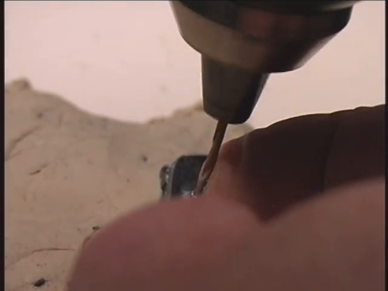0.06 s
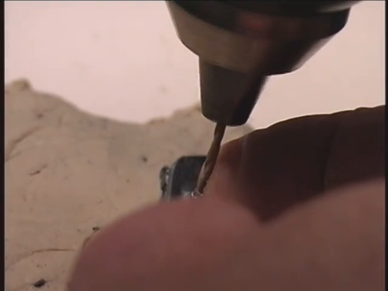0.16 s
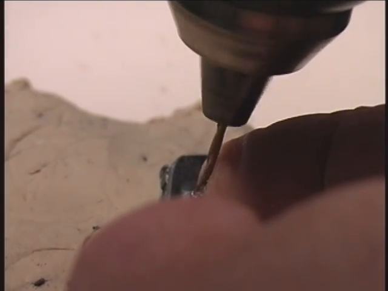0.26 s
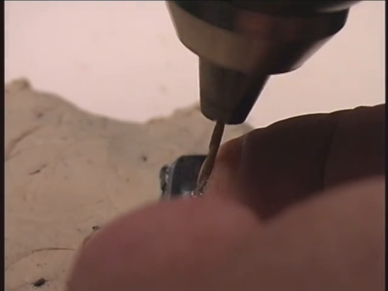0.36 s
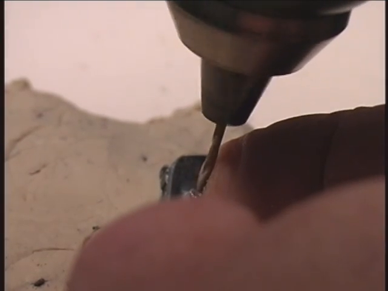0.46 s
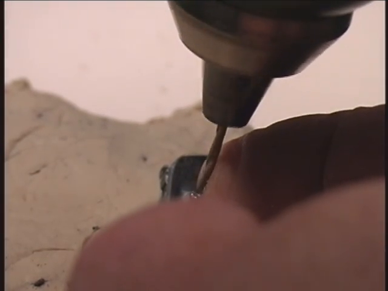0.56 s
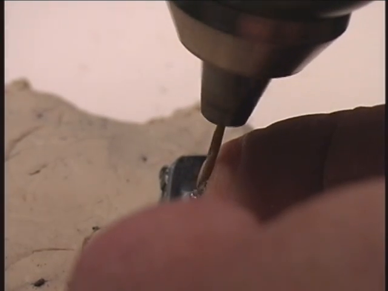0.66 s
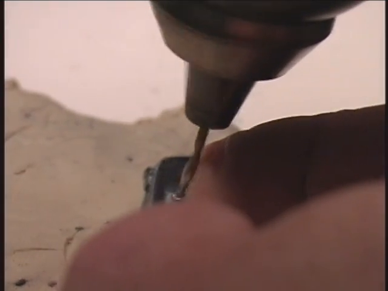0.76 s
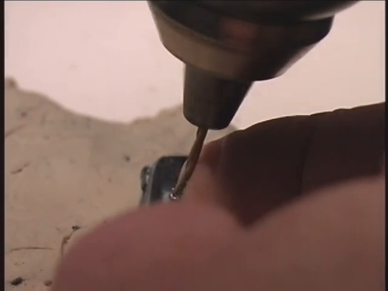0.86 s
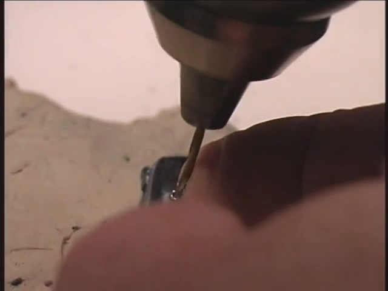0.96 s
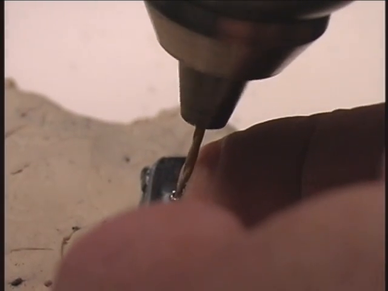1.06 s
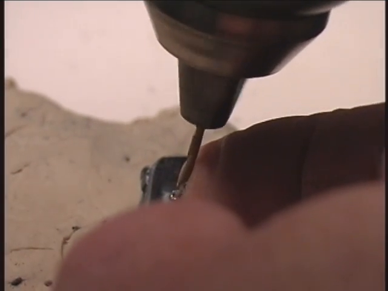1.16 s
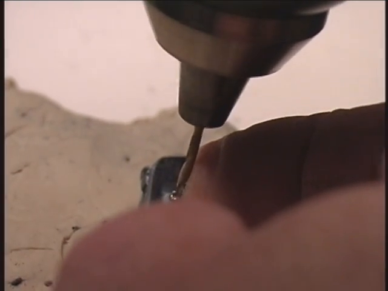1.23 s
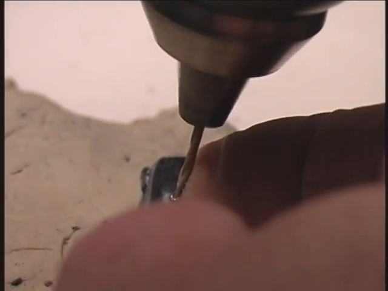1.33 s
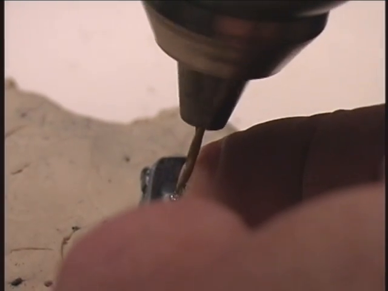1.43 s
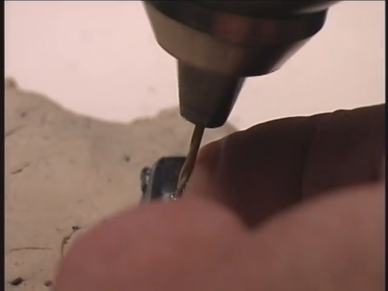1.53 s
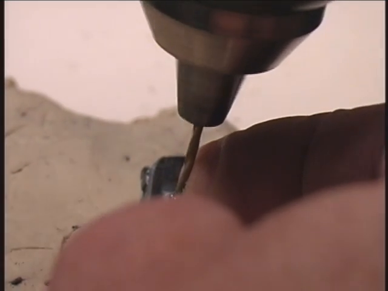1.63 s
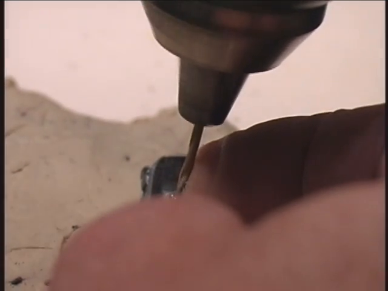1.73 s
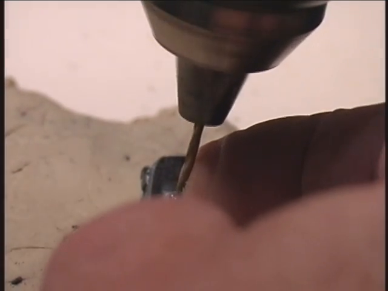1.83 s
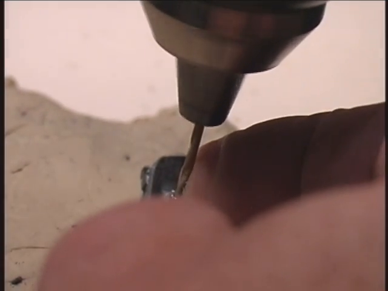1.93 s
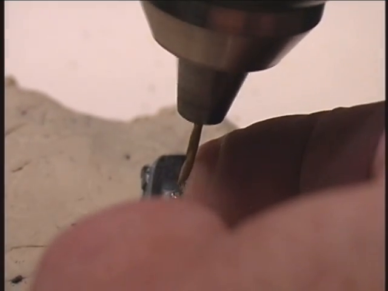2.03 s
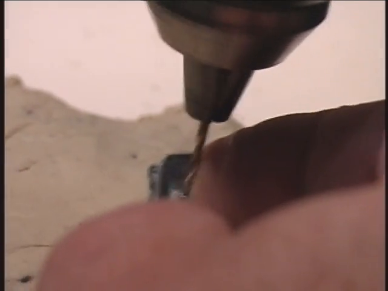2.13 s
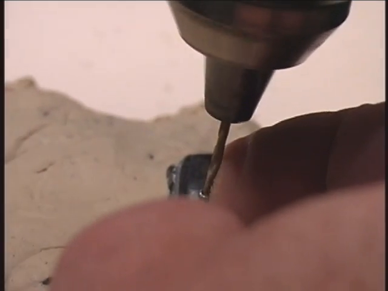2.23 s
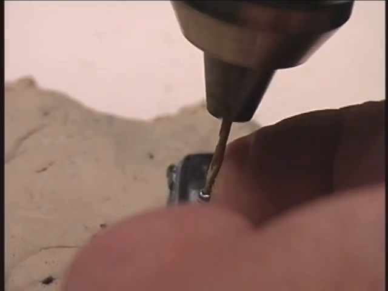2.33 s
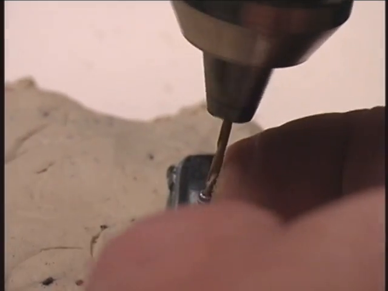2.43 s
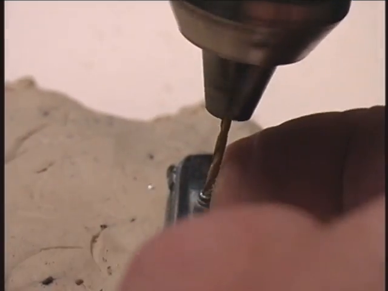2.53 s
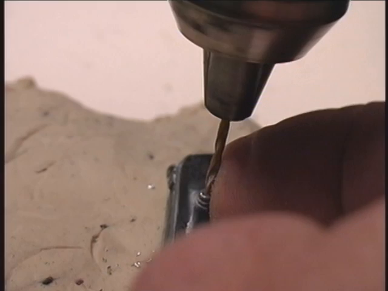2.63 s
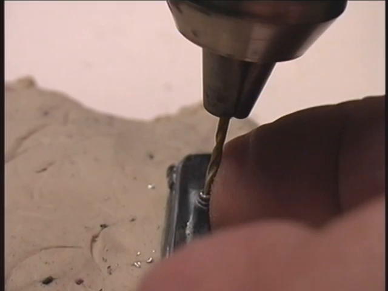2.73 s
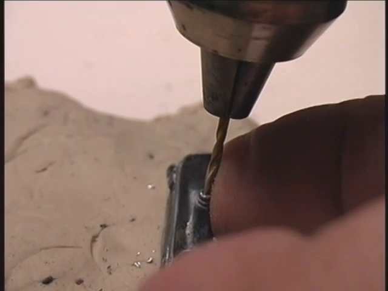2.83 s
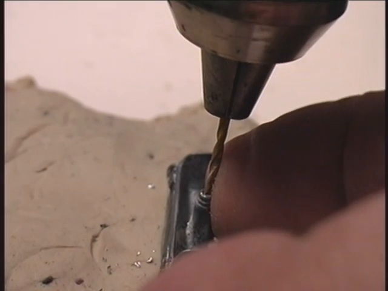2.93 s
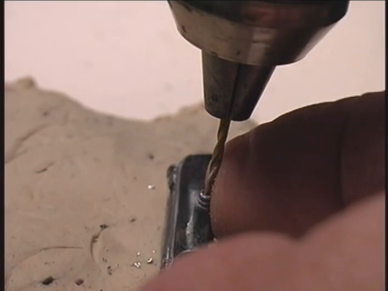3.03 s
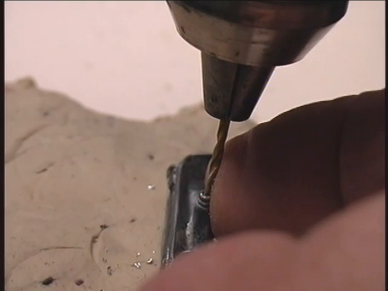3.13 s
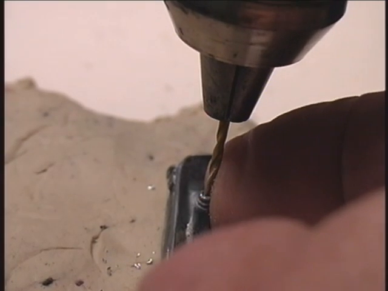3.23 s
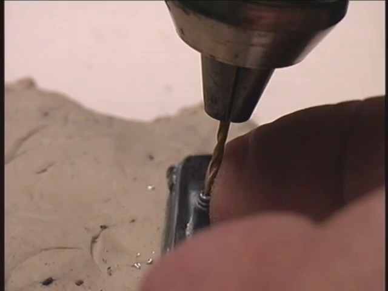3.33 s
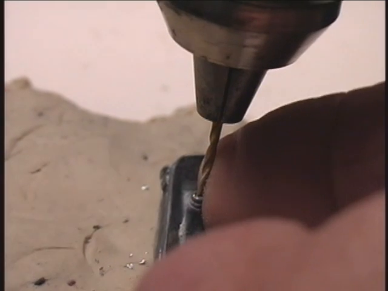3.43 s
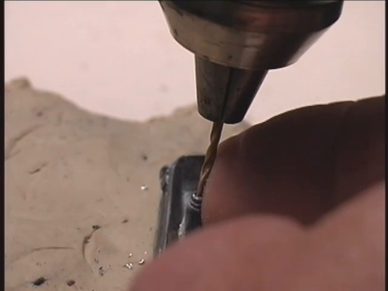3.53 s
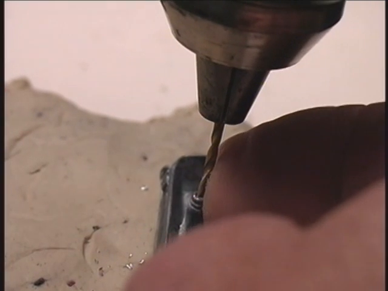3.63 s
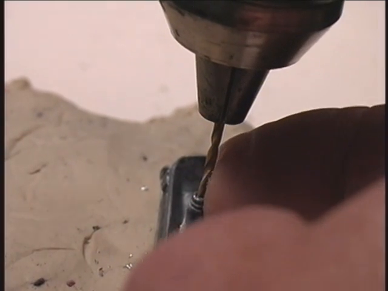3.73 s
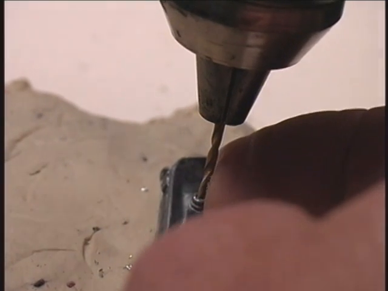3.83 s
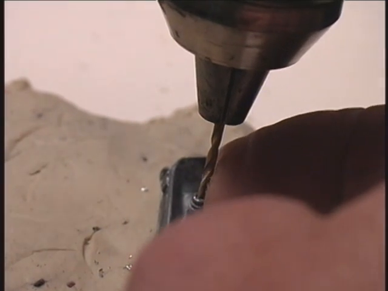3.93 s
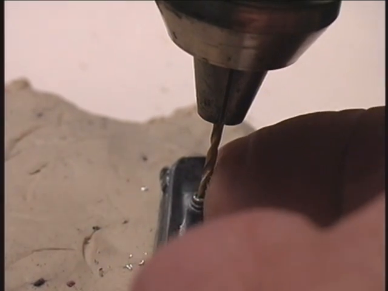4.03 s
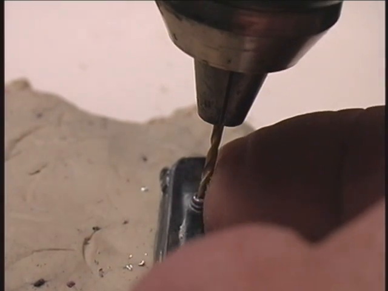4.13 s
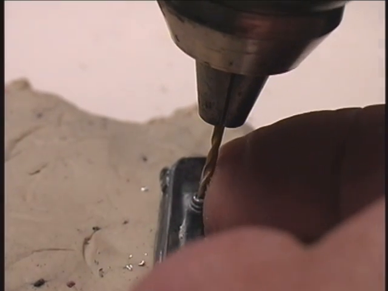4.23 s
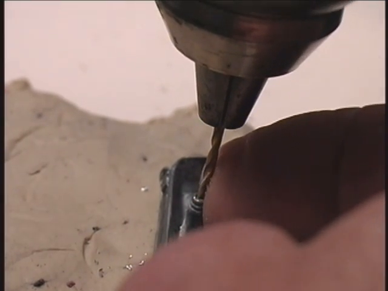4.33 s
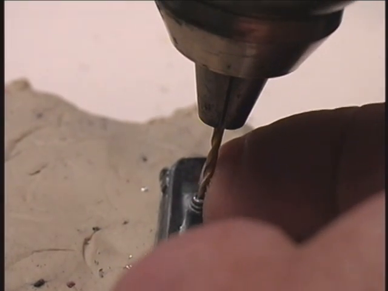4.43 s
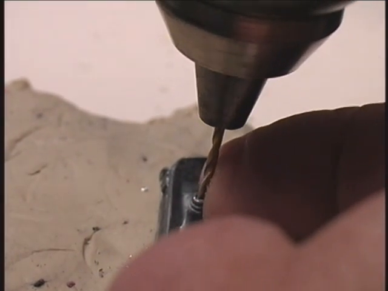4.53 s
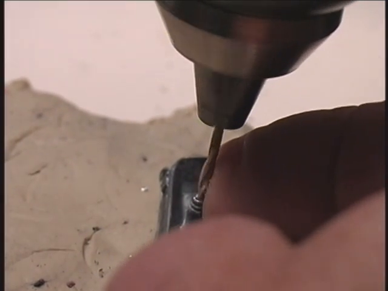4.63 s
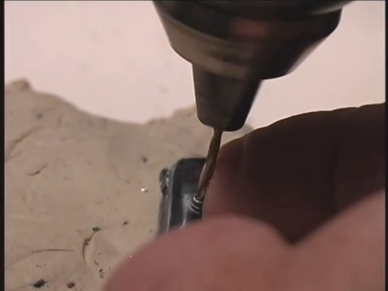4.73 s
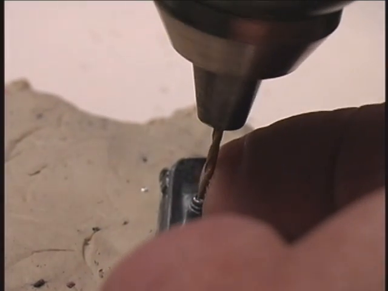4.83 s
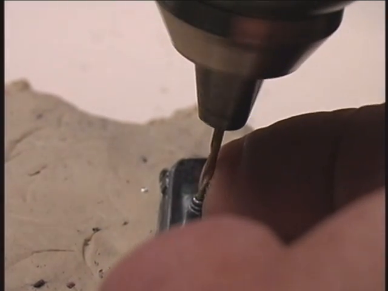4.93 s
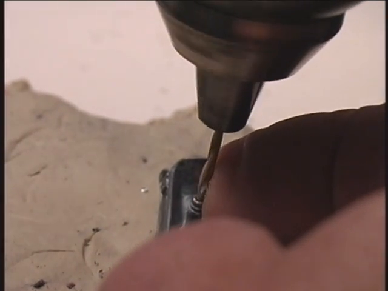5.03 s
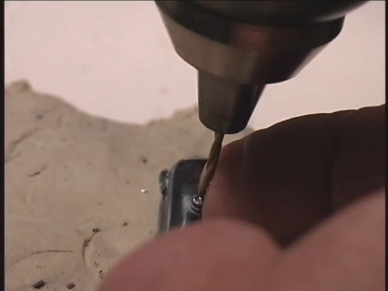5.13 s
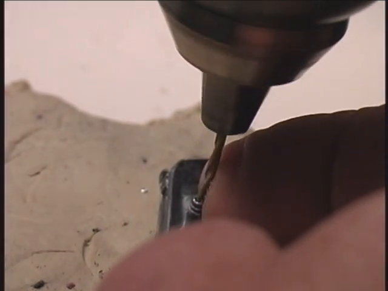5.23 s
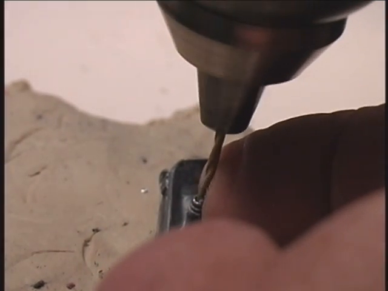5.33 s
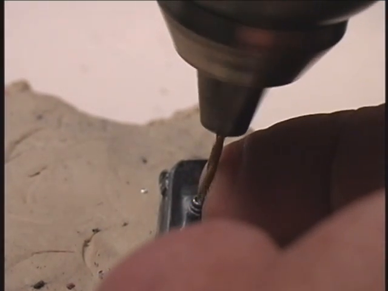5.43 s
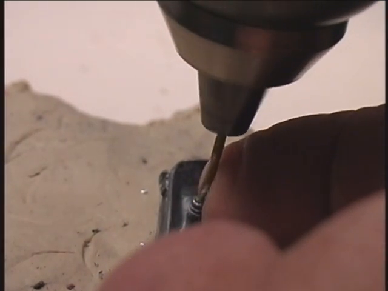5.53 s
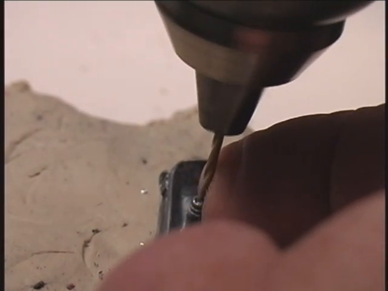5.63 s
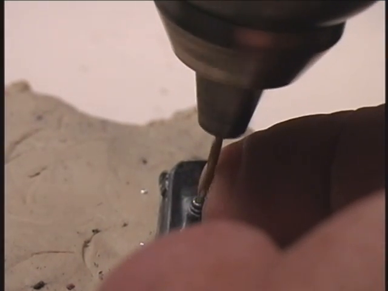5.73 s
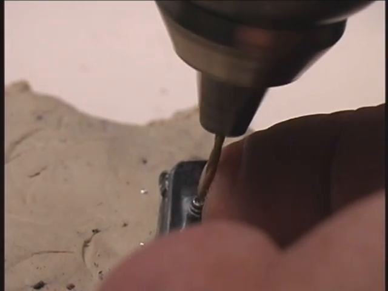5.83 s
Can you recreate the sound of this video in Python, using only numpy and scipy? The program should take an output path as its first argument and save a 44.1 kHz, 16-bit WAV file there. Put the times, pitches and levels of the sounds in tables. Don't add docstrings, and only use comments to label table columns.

```python
import sys
import numpy as np
from scipy import signal
from scipy.io import wavfile

SR = 44100
rng = np.random.default_rng(int(sys.argv[2]) if len(sys.argv) > 2 else 0)


def gain_from_db(level_db):
    decades = np.asarray(level_db, float) / 20
    return 10 ** decades


def put_to_file(sound):
    columns = np.atleast_2d(sound).T
    safe = np.clip(columns, -1, 1)
    whole_steps = np.round(safe * 32767)
    wavfile.write(sys.argv[1], SR, whole_steps.astype(np.int16))


N = 259308
TIME = np.arange(N) / SR


def rms_one(x):
    return x / np.sqrt(np.mean(x ** 2) + 1e-20)


def in_time(rows):
    s, *columns = np.transpose(rows)
    return [np.interp(TIME, s, column) for column in columns]


def while_on(rows, fade=0.004):
    start, end = rows[0][0], rows[-1][0]
    return np.interp(TIME, [start - fade, start, end, end + fade], [0, 1, 1, 0])


def bumps(rows):
    return sum(height * np.exp(-((TIME - s) / max(half, .003)) ** 2) for s, half, height in rows)


def drift(rate):
    r = np.exp(-80 * np.pi * rate / SR)
    slow = signal.lfilter([1], [1, -2 * r, r * r], rng.standard_normal(N // 40 + 2002))[2000:]
    return np.interp(np.arange(N) / 40, np.arange(len(slow)), rms_one(slow))


def resonate(x, hz, width):
    r = np.exp(-np.pi * width / SR)
    return signal.lfilter([(1 - r * r) / 2, 0, (r * r - 1) / 2],
                          [1, -2 * r * np.cos(2 * np.pi * hz / SR), r * r], x)


def coloured(sources, spectrum, moving_db=lambda hz: 0):
    edges = 25 * 2 ** (np.arange(29) / 3)
    hz, db = np.transpose(spectrum)
    bands = []
    for k, (low, high) in enumerate(zip(edges, edges[1:])):
        band_filter = signal.butter(2, [low, high], "band", fs=SR, output="sos")
        gain_db = np.interp(np.log(low * high) / 2, np.log(hz), db)
        bands.append(signal.sosfilt(band_filter, sources[k % 2]) * gain_from_db(gain_db))
    total = np.sqrt(np.mean(sum(bands) ** 2))
    return sum(band * gain_from_db(moving_db(1.19 * low)) for band, low in zip(bands, edges)) / total


def burst(at, length, rise=.3):
    i = min(int(at * SR), N - 2)
    u = np.linspace(0, 1, max(int(length * SR), 2))[:N - i]
    return slice(i, i + len(u)), np.sin(np.pi * u ** rise) ** 2


def settle(pulls):
    hz = np.full(N, float(pulls[0][1]))
    for s, goal, lag in pulls[1:]:
        i = int(s * SR)
        hz[i:] = goal + (hz[i] - goal) * np.exp(-(TIME[i:] - s) / lag)
    return hz


def idle_input(left):
    # (pitch_hz, level_db per Hz)
    idle_colour = [(25, 0), (200, -9), (1000, -14), (4000, -15), (8000, -19), (15700, -22)]
    hiss_db, crosstalk_db, clock_db = -87, -76, -108
    hiss = gain_from_db(hiss_db) * coloured(rng.standard_normal((2, N)), idle_colour)
    clock = gain_from_db(clock_db) * np.sin(2 * np.pi * 8000 * TIME)
    return hiss + clock + gain_from_db(crosstalk_db) * left


def camera():
    # (multiple of drum_hz, level_db rms)
    drum = [(4, -84), (5, -75), (6, -89), (7, -84), (8, -88), (9, -90), (10, -89), (11, -83), (12, -78),
            (13, -83), (14, -91), (15, -94), (17, -90), (18, -97), (21, -100), (22, -100), (23, -101),
            (29, -99), (30, -91), (31, -98), (35, -99), (36, -97), (37, -94), (38, -96), (39, -94),
            (40, -101), (42, -98)]
    # (pitch_hz, level_db rms)
    capstan = [(3994, -89), (4092, -93), (5566, -90), (9582, -97)]
    # (pitch_hz, level_db per Hz)
    hiss_colour = [(25, 5), (60, 2), (130, -3), (300, -8.5), (1500, -11.5), (4000, -16.5), (6000, -19.5),
                   (8500, -26.5), (12000, -28.5), (13500, -33.5), (15700, -32)]
    drum_hz, line_scan_hz, line_scan_db, hiss_db = 299.49, 15734.2, -97, -65.5
    start = rng.uniform(0, 2 * np.pi, 40)
    flutter = gain_from_db([1.4 * drift(15), 1.4 * drift(12), 1.4 * drift(20)])
    buzz = gain_from_db(line_scan_db) * np.sin(2 * np.pi * line_scan_hz * TIME)
    for (multiple, db), phase in zip(drum, start):
        tone = np.sin(2 * np.pi * multiple * drum_hz * TIME + phase)
        buzz += gain_from_db(db - .5) * flutter[int(multiple) % 3] * tone
    for hz, db in capstan:
        buzz += gain_from_db(db) * np.sin(2 * np.pi * hz * TIME)
    hiss = gain_from_db(hiss_db) * coloured(rng.standard_normal((2, N)), hiss_colour)
    return np.sqrt(2) * buzz + hiss


def handling():
    # (start_s, peak_db, pitch_hz, fade by 60 dB_s)
    ticks = [(2.628, -42, 2900, .008), (2.712, -32, 3000, .006), (2.786, -36, 3300, 0.006),
             (2.822, -46, 1800, .008), (2.843, -45, 1800, .008), (2.858, -47, 2200, .008),
             (2.858, -48, 3700, .006), (2.857, -54, 1400, .007), (2.873, -47, 2600, .007),
             (2.874, -50, 4100, .006), (2.874, -54, 1400, .007), (2.786, -47, 5500, .005),
             (3.22, -49, 2100, .012), (3.221, -62, 5200, .01), (3.335, -59, 2200, .04),
             (3.46, -59, 800, 0.033), (3.948, -52, 4240, .02), (3.951, -50.5, 2940, .02),
             (3.952, -70, 7200, .02), (4.537, -52, 2250, .012), (4.588, -42, 1190, 0.022),
             (4.709, -11.5, 3770, 0.0089)]
    # (centre_s, length_s, level_db, pitch_hz, width_hz)
    rubs = [(2.95, 0.087, -76, 7000, 3000), (3.176, .04, -72, 5470, 4500), (3.34, .04, -74, 4900, 900),
            (3.492, 0.083, -67.5, 4500, 4500), (3.56, .05, -76, 4900, 900), (3.955, 0.012, -60, 5030, 4500),
            (4.05, 0.09, -71, 5000, 1300), (4.167, .1, -73, 5100, 1100)]
    # (start_s, level_db, pitch_hz)
    thumps = [(3.48, -56.5, 78), (3.47, -65, 168), (3.97, -62, 90), (4.3, -64.5, 190), (4.37, -70, 190),
              (2.779, -58, 195), (4.8, -46, 143)]
    out, noise = np.zeros(N), rng.standard_normal(N)
    for s, db, hz, t60 in ticks:
        span, _ = burst(s, .05)
        fading = np.abs(noise[span]) * gain_from_db(-60 * (TIME[span] - s) / max(t60, .002))
        ring = resonate(resonate(fading, hz, 0.36 * hz), hz, 0.36 * hz)
        out[span] += gain_from_db(db) * ring / np.abs(ring).max()
    for s, length, db, hz, width in rubs:
        span, shape = burst(s - length / 2, length, rise=.8)
        rub = resonate(resonate(noise[span], hz, width), hz, width)
        out[span] += gain_from_db(db) * shape * rms_one(rub)
    for s, db, hz in thumps:
        span, shape = burst(s, 0.07, rise=0.34)
        out[span] += gain_from_db(db) * shape * np.sin(2 * np.pi * hz * (TIME[span] - s))
    return out


def chopper():
    # (time_s, pitch_hz, level_db)
    pressure = [(2.7, 12624, -82), (2.9, 12630, -82), (3.14, 12480, -82), (3.2, 12600, -79),
                (3.4, 12610, -78), (3.52, 12560, -81), (3.74, 12550, -76), (3.9, 12625, -82),
                (4.05, 12638, -75), (4.575, 12635, -77), (4.585, 9800, -74), (4.66, 9700, -68),
                (4.74, 10300, -55), (4.86, 10600, -61), (4.96, 11200, -58), (5.1, 11150, -58),
                (5.3, 10400, -62)]
    # (centre_s, half_length_s, sag_hz)
    twitches = [(3.255, .06, 420), (3.227, .012, 200), (3.262, .024, 1050), (4.534, .013, 620),
                (4.57, .025, 370)]
    skip_every_s = .033
    resting_hz, db = in_time(pressure)
    hz = resting_hz - bumps(twitches)
    skips, since = np.divmod(TIME - .0228, skip_every_s)
    unsteady_hz = 4 + .12 * np.abs(12640 - hz)
    turn = 2 * np.pi * np.cumsum(hz + unsteady_hz * drift(60) - 5) / SR
    turn = turn + 1.1 * skips
    kick_db = 4 * np.exp(-since / .008) + .003 * (resting_hz - hz)
    return gain_from_db(db + 0.5 + kick_db) * np.sqrt(2) * np.sin(turn) * while_on(pressure)


def jolt():
    jolt_s, jolt_db, fade_60_db_s = 4.585, -50, .15
    wind_up_hz, wind_up_s, wind_up_db = (1000, 3200), .022, -41
    since = np.maximum(TIME - jolt_s, 0)
    slack = rms_one(resonate(resonate(rng.standard_normal(N), 4200, 6000), 4200, 6000))
    snap = slack * gain_from_db(jolt_db - 60 * since / fade_60_db_s) * np.minimum(since / .001, 1)
    span, shape = burst(jolt_s + .003, wind_up_s, rise=1.4)
    hz = np.geomspace(*wind_up_hz, len(shape))
    snap[span] += gain_from_db(wind_up_db) * shape * np.sin(2 * np.pi * np.cumsum(hz) / SR)
    return snap


def bites():
    # (time_s, peak_db, ring_hz)
    catches = [(0.0294, -32.5, 1150), (0.8066, -33, 1165), (0.9494, -31.5, 1246), (1.0809, -32.5, 1070),
               (1.221, -29.5, 1050), (1.3588, -29.5, 1190), (1.499, -31.5, 1050), (1.638, -33, 1050),
               (1.77, -32, 1075), (1.9155, -32.5, 1150), (2.042, -32, 1260), (2.158, -38, 1200),
               (2.3486, -37, 1010), (2.5994, -38, 1167), (4.807, -31.5, 1280), (4.9494, -39, 1170),
               (5.065, -32, 1190), (5.328, -28, 1083), (5.5727, -29.5, 1260), (5.674, -29.5, 1200),
               (5.7986, -25.5, 1165)]
    # (pitch_hz, width_hz, level_db)
    workpiece = [(152, 25, -19), (774, 87, -14), (1690, 270, 5.5)]
    out, grind = np.zeros(N), rng.standard_normal(N)
    body = sum(gain_from_db(db) * rms_one(resonate(grind, hz, width)) for hz, width, db in workpiece)
    for s, db, hz in catches:
        span, shape = burst(s - .008, 0.066, rise=0.63)
        bit_ring = rms_one(resonate(grind[span], hz, 34))
        out[span] += gain_from_db(db - 9) * shape * (bit_ring + body[span])
    return out


def first_speed():
    # (start_s, new_mesh_hz, time_constant_s)
    first_pulls = [(0, 1150, .01), (0, 1358, .15), (.822, 1530, .165), (1.7, 1545, .1), (1.82, 1584, .025)]
    hunt_s, hunt_hz, hunt_per_s, hunt_quickens = (1.85, 2.09), 22, 7.3, 21
    release_s, coast_hz_per_s = 2.108, 2150
    u = TIME - hunt_s[0] - .03
    hunt = hunt_hz * np.cos(2 * np.pi * u * (hunt_per_s + hunt_quickens * u))
    hunt = hunt * while_on(np.transpose([hunt_s]), fade=.02)
    coast = coast_hz_per_s * np.maximum(TIME - release_s, 0)
    return np.maximum(settle(first_pulls) + hunt - coast, 0)


def second_speed():
    # (start_s, new_mesh_hz, time_constant_s)
    second_pulls = [(5.33, 1105, .01), (5.335, 1466, .19), (5.75, 1700, .3)]
    return settle(second_pulls)


def whine(mesh_hz, span):
    # (mesh_hz, mesh level_db, one-third order level_db, singing level_db)
    radiates = [(960, -48, -72, -55), (1130, -48, -69, -46), (1210, -44, -65, -40), (1300, -43, -63, -39),
                (1345, -43, -61, -41), (1410, -46, -68, -44), (1465, -49, -76, -38), (1530, -47, -78, -39),
                (1590, -52, -78, -36)]
    # (order, level_db)
    singing = [(2.92, -1), (3.055, -1), (3.19, -3), (3.325, 0), (3.6, -6), (4, 1)]
    singing_hz, singing_width_hz = 5130, 480
    coast_hz_per_s, coast_loss_db = 2150, 3
    speeds, *levels = np.transpose(radiates)
    unloaded = coast_loss_db * np.clip(-np.gradient(mesh_hz) * SR / coast_hz_per_s, 0, 1)
    mesh_db, third_db, singing_db = [np.interp(mesh_hz, speeds, db) - k * unloaded
                                     for db, k in zip(levels, (1, 4, 1.2))]
    turn = 2 * np.pi * np.cumsum(mesh_hz * (1 + .001 * drift(25))) / SR
    tones = gain_from_db(mesh_db + 2 * drift(20)) * np.sin(turn)
    tones += gain_from_db(third_db) * np.sin(turn / 3)
    for order, db in singing:
        off_centre = (order * mesh_hz - singing_hz) / singing_width_hz
        order_db = singing_db + db - 6 * off_centre ** 4 + 1.8 * drift(20)
        tones += gain_from_db(order_db) * np.sin(order * turn)
    return np.sqrt(2) * tones * while_on(np.transpose([span]), fade=.03)


def whines():
    # (start_s, end_s)
    spans = [(0, 2.4), (5.33, 5.88)]
    return whine(first_speed(), spans[0]) + whine(second_speed(), spans[1])


def teeth(lost_db):
    knocks_per_s, knocks_follow, slide_follows = 3100, .7, 0.14
    uneven_db = -0.5
    per_s = knocks_per_s * gain_from_db(-knocks_follow * lost_db) + 250
    strength = gain_from_db(uneven_db * np.minimum(rng.exponential(1, N), 3.5))
    strength = strength * (rng.random(N) < per_s / SR)
    knocks = strength * rng.choice([-1, 1], (2, N)) / np.sqrt(per_s / SR)
    slide_gain = gain_from_db(-slide_follows * np.maximum(lost_db - 12, 0))
    return rms_one(knocks) + slide_gain * rng.standard_normal((2, N))


def band_swings(lost_db, since):
    # (centre_s, half_length_s, change_db)
    binds = [(2.22, 0.085, -1.5), (2.5, .04, 3), (2.66, .03, -3), (4.67, 0.1, 2.5), (4.92, .07, 2.5),
             (5.04, 0.084, 1), (5.21, 0.025, 8.5), (5.275, 0.02, 5), (5.36, 0.055, 3), (5.88, 0.1, 1.5)]
    bind_shares = [.4, 0.19, .1, 0.87, 0.046, 0.049]
    rumble_holds, low_holds, brush_holds, sparks_hold = 0.75, 0.17, -.15, -.3
    rumble_holds_to_db = 18
    brush_late_db, brush_late_s = -4.5, 0.17
    sparks_late_db, sparks_late_s = -3, 1.5
    restarted = since > 0
    rumble = rumble_holds * np.minimum(lost_db, rumble_holds_to_db)
    brushes = brush_holds * lost_db + brush_late_db * np.exp(-np.abs(since) / brush_late_s) * restarted
    sparks_late = sparks_late_db * np.exp(-np.abs(since) / sparks_late_s) * restarted
    sparks = brushes + sparks_hold * lost_db + sparks_late
    held = [.4 * rumble, rumble, low_holds * lost_db, 0, brushes, sparks]
    bind_db = bumps(binds)
    offsets = [h + share * bind_db for h, share in zip(held, bind_shares)]
    anchors = np.log([70, 250, 1400, 3500, 11000, 15500])   # Hz, one for each offset
    load = 0.15 * drift(7.4) + 0.49 * drift(30.5)

    def moving_db(hz):
        place = np.interp(np.log(hz), anchors, np.arange(len(anchors)))
        below = min(int(place), 4)
        share = place - below
        blend = (1 - share) * offsets[below] + share * offsets[below + 1]
        return blend + load + 0.72 * drift(14.0)
    return moving_db


def casing(out, lost_db, since):
    # (pitch_hz, width_hz, boost_db; negative cuts)
    shell = [(66.7, 15.5, 14), (147, 18, 5.5), (204.6, 5.7, 6), (338.3, 23, 8.5), (721, 56, 4.5),
             (1050, 13, 5), (1206, 160, 7), (1732, 81, 5.5), (1880, 100, 3.5), (2400, 130, 3),
             (2926, 74, 5.5), (3165, 126, 5.5), (3550, 228, 5), (4000, 290, 5), (4900, 310, 1),
             (5360, 275, 4), (7830, 190, 4), (11100, 170, 0.5), (11240, 350, 5.5), (12250, 400, -4),
             (13220, 490, 9), (14800, 400, -7), (15500, 600, -8.5), (1530, 180, -2), (2050, 100, -3)]
    # (time_s, share 0-1)
    loose_hand = [(0, 0.1), (1.55, .15), (1.88, 0.7), (2.2, .95), (2.4, 0.7), (2.9, 1), (4.6, 0.3),
                  (5.88, 0.66)]
    # (pitch_hz, width_hz, boost_db)
    freed = [(1720, 70, -3), (2830, 58, 4), (4670, 440, 1.5), (5460, 270, 3)]
    # (pitch_hz, width_hz, boost_db)
    slow_rings = [(1800, 93, 8.9), (1200, 83, 2), (5400, 180, 2.4)]
    slow_from_db = 26
    for hz, width, boost_db in shell:
        out = out + (gain_from_db(boost_db) - 1) * resonate(out, hz, width)
    loose, = in_time(loose_hand)
    for hz, width, boost_db in freed:
        out = out + loose * (gain_from_db(boost_db) - 1) * resonate(out, hz, width)
    slowing = np.clip(lost_db / slow_from_db, 0, 1) ** 2 * (since < 0)
    for hz, width, boost_db in slow_rings:
        out = out + slowing * (gain_from_db(boost_db) - 1) * resonate(out, hz, width)
    return out


def gears():
    # (pitch_hz, level_db per Hz)
    gear_colour = [(18, -37), (30, -23), (105, -31), (144, -16.5), (231, -21), (333, -19), (561, -18.5),
                   (947, -13.5), (1230, -8.5), (2020, -3), (2990, 1.5), (7880, -7), (12000, -24),
                   (13300, -29), (15600, -13)]
    # (time_s, level_db)
    first_run = [(0, -26), (.2, -25), (1.9, -24.5), (2.2, -27), (2.48, -33), (2.66, -41), (2.8, -51),
                 (2.88, -61), (2.9, -81)]
    # (time_s, level_db)
    second_run = [(4.583, -62.5), (4.595, -47.5), (4.61, -36.5), (4.65, -30), (5.25, -31), (5.3, -27.5),
                  (5.45, -23.5), (5.88, -24.5)]
    full_db = -25
    effort_db, = in_time(first_run + second_run)
    lost_db = np.minimum(full_db - effort_db, 35)
    since = TIME - second_run[0][0]
    shaking = coloured(teeth(lost_db), gear_colour, band_swings(lost_db, since))
    running = while_on(first_run) + while_on(second_run)
    return gain_from_db(effort_db - 3.0) * casing(shaking, lost_db, since) * running


def scene():
    drill = gears() + whines() + jolt() + bites() + chopper()
    left = 2 * (drill + handling() + camera())
    return np.array([left, idle_input(left)])


def band_limit(x):
    return signal.sosfilt(signal.butter(12, 15750, fs=SR, output="sos"), x)


def record(dry):
    mix = .9 * np.tanh(dry / .9)
    return band_limit(mix)


dry = scene()
out = record(dry)
put_to_file(out)
```